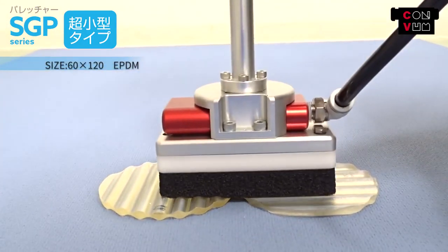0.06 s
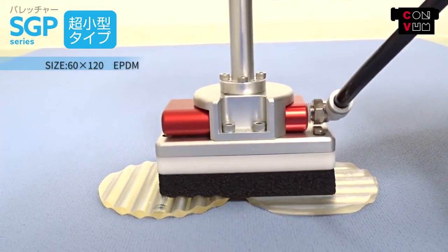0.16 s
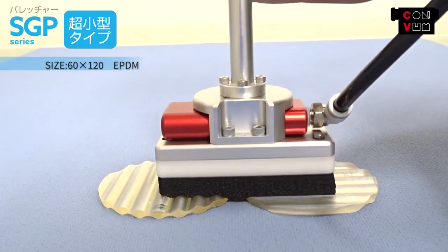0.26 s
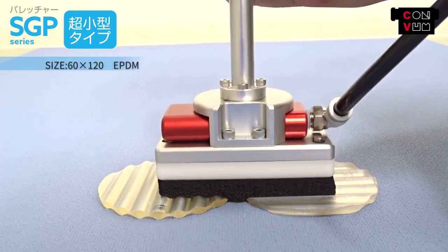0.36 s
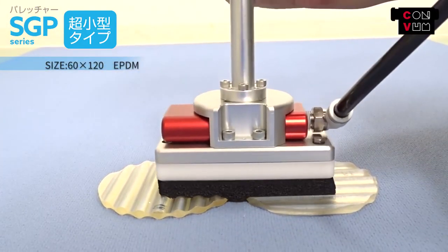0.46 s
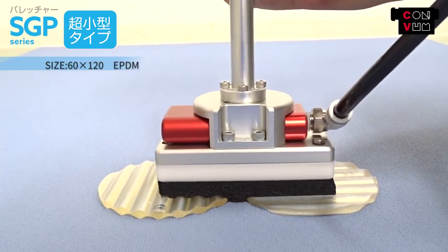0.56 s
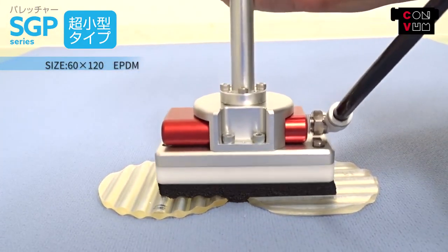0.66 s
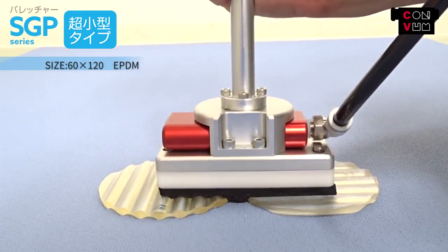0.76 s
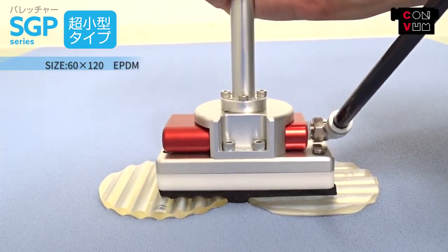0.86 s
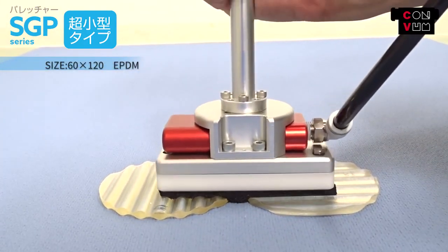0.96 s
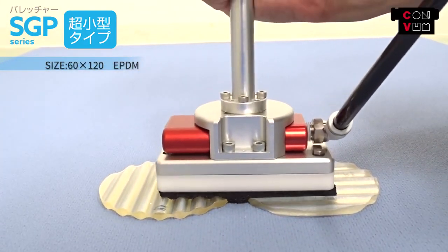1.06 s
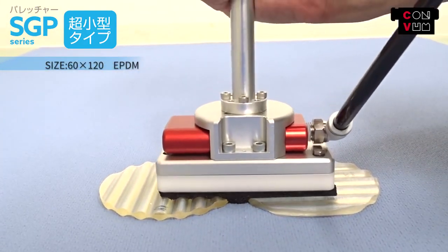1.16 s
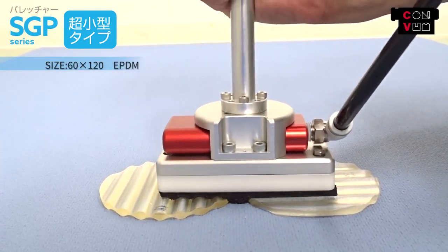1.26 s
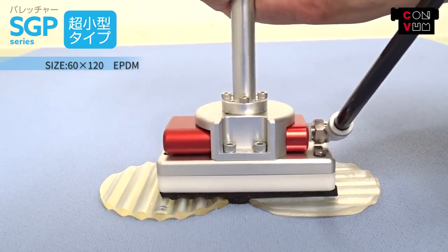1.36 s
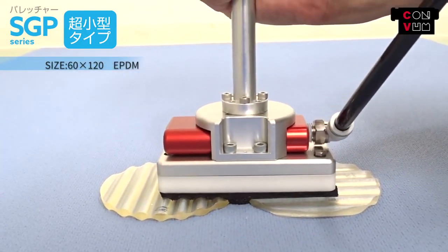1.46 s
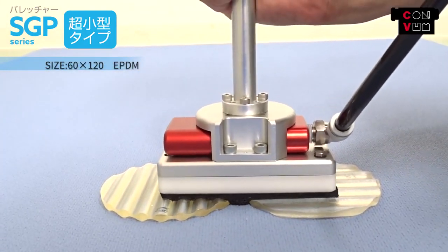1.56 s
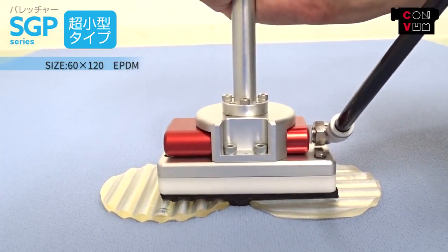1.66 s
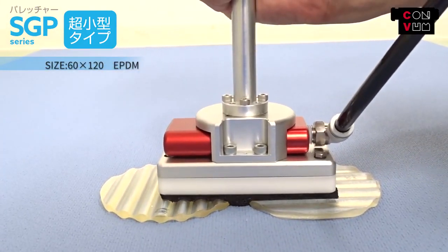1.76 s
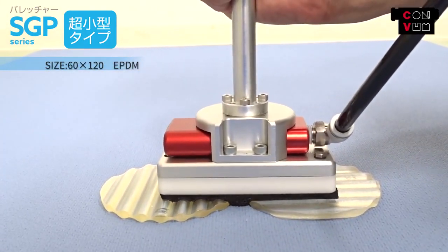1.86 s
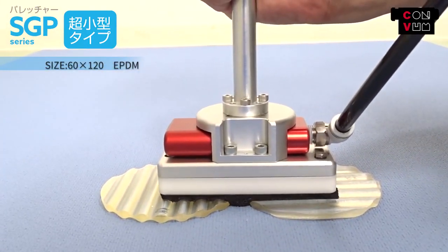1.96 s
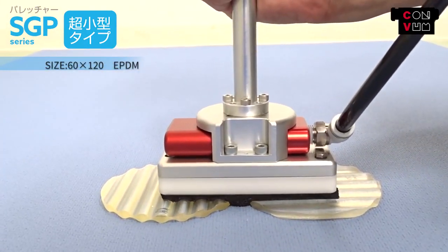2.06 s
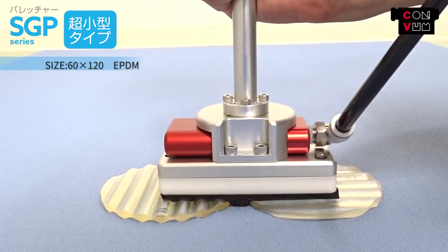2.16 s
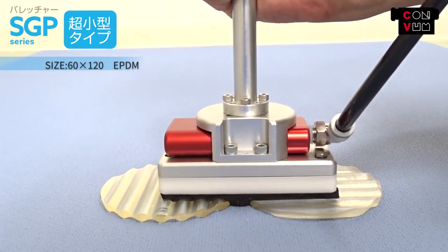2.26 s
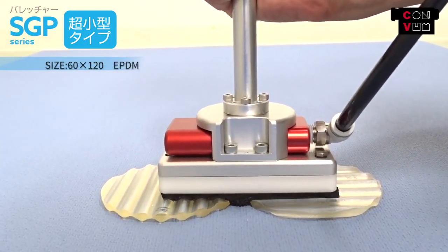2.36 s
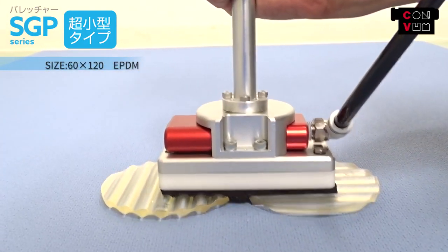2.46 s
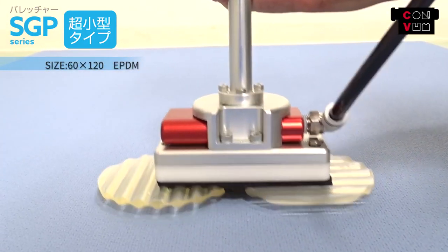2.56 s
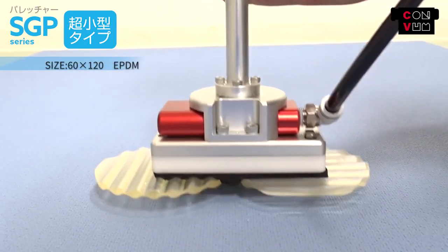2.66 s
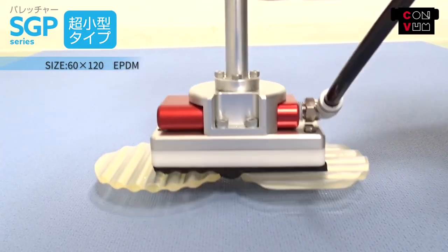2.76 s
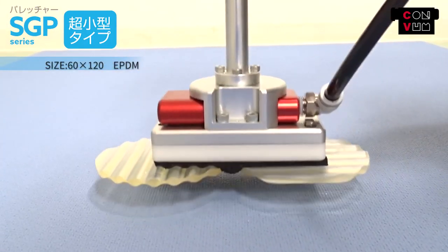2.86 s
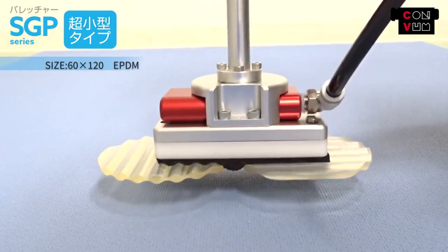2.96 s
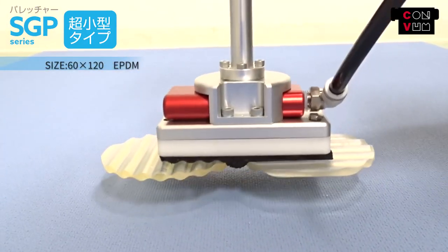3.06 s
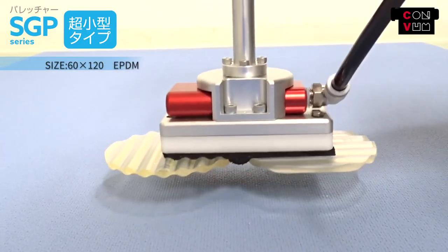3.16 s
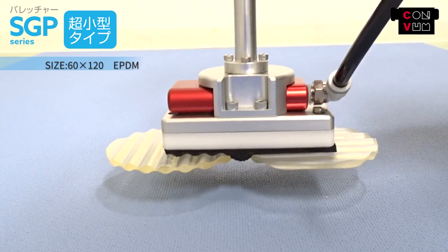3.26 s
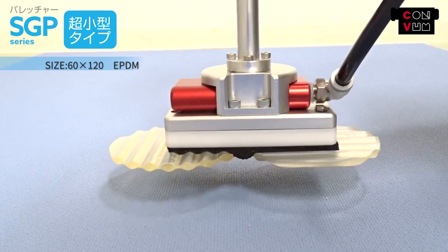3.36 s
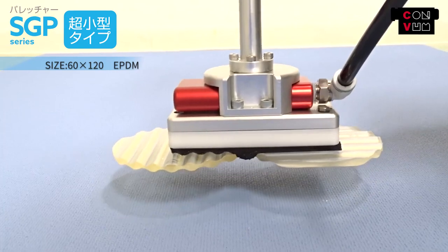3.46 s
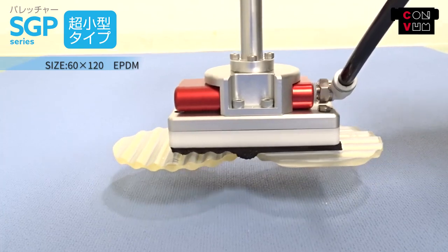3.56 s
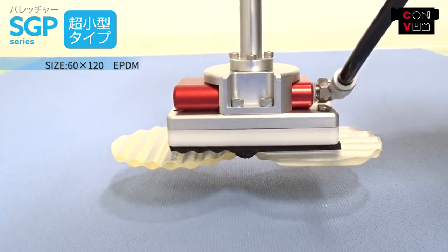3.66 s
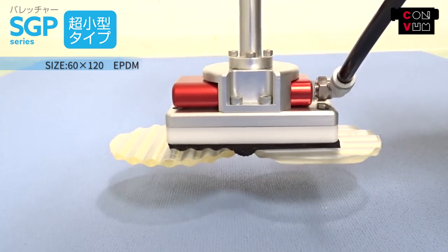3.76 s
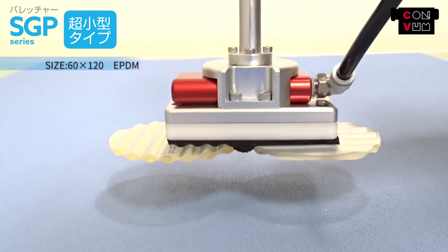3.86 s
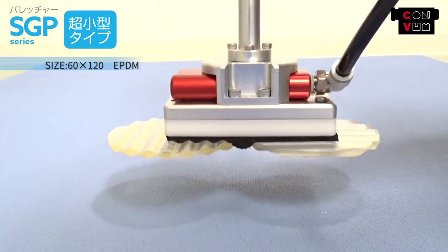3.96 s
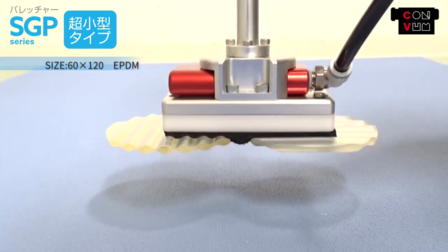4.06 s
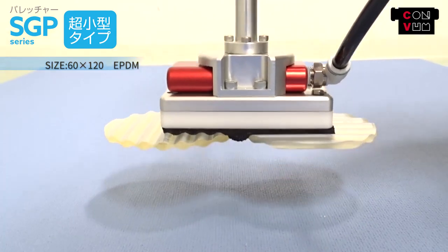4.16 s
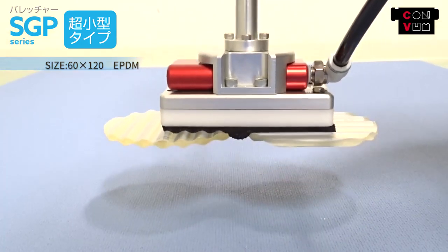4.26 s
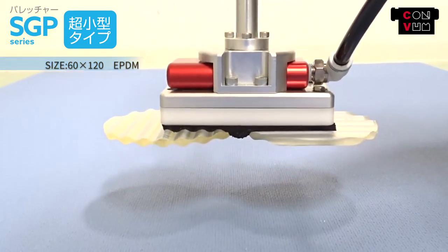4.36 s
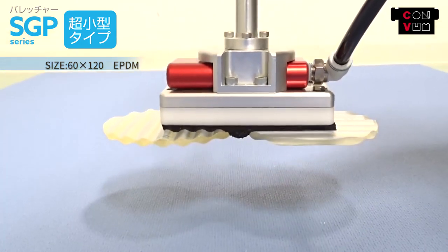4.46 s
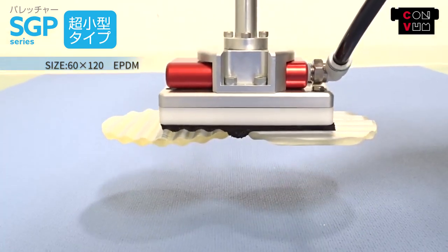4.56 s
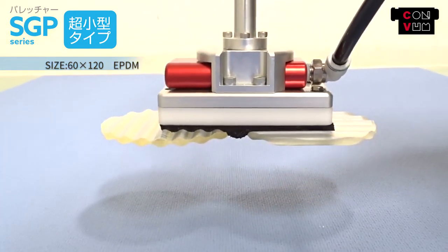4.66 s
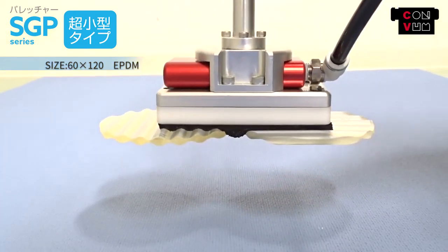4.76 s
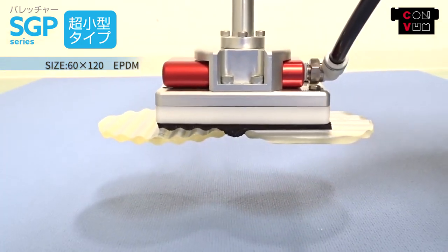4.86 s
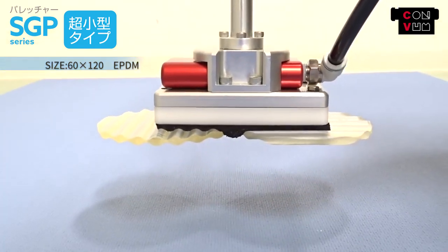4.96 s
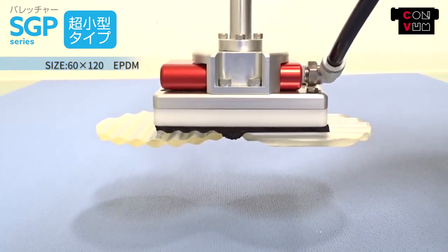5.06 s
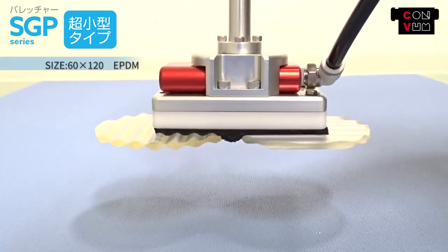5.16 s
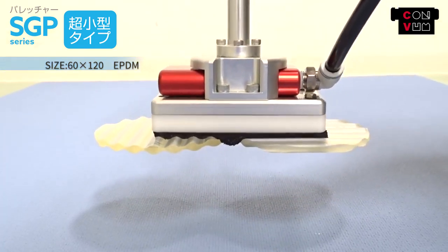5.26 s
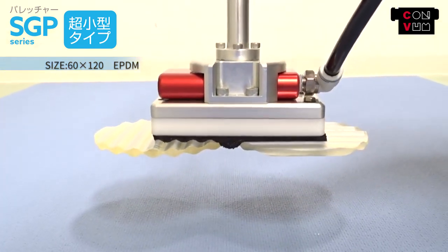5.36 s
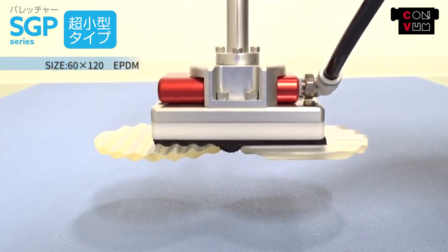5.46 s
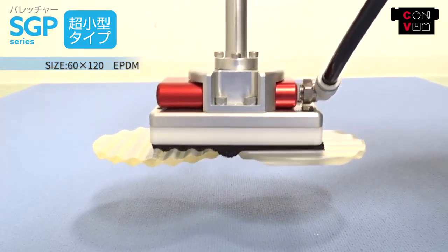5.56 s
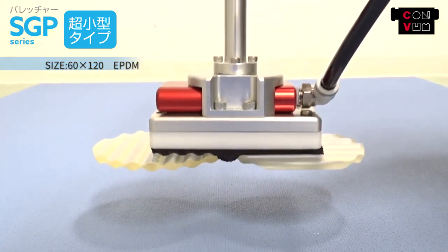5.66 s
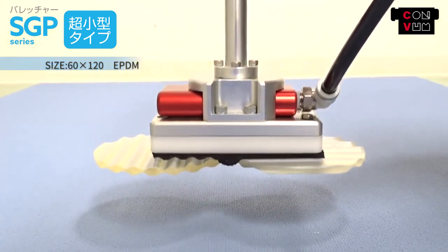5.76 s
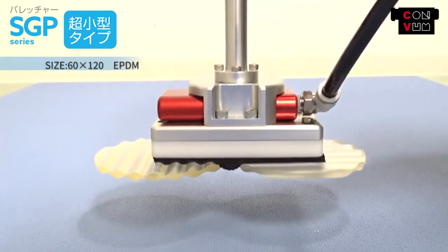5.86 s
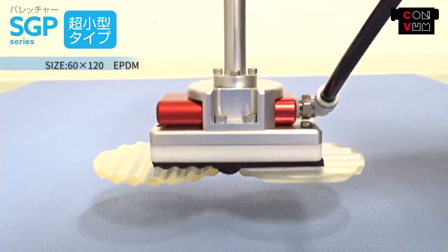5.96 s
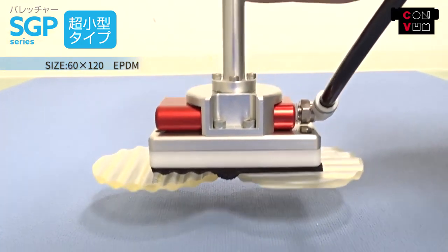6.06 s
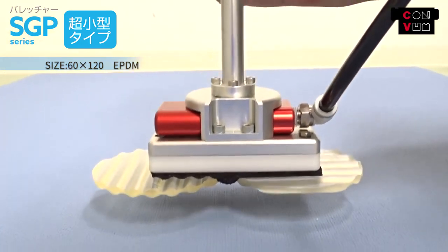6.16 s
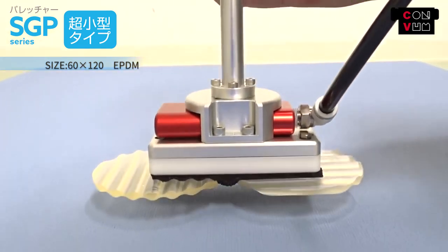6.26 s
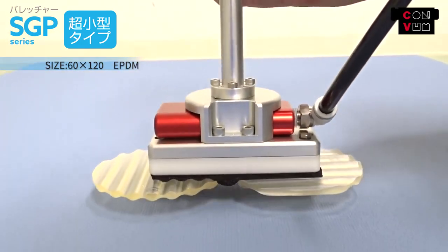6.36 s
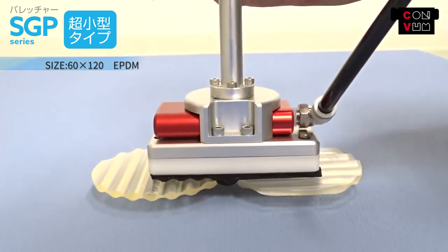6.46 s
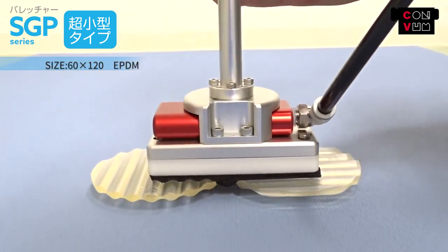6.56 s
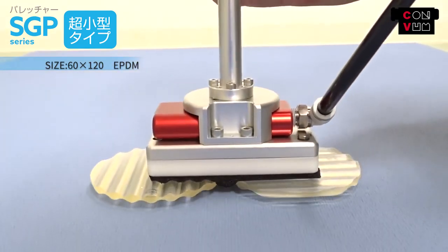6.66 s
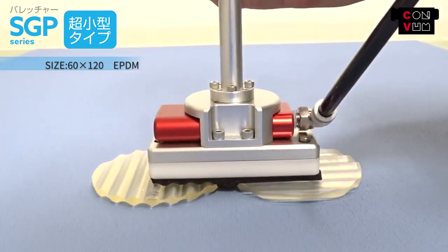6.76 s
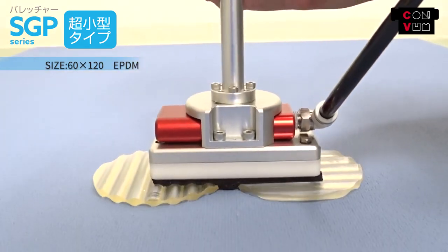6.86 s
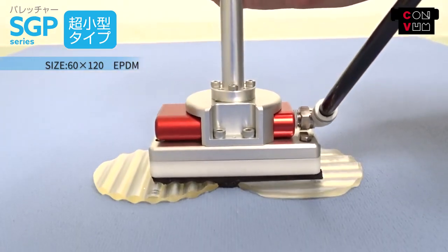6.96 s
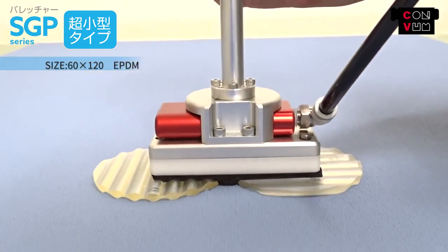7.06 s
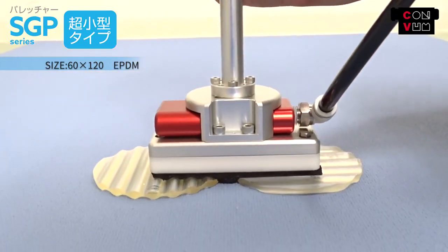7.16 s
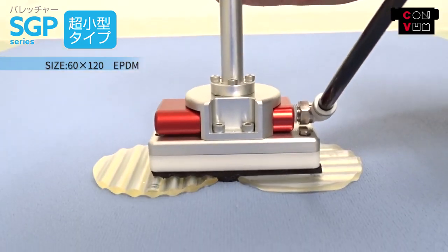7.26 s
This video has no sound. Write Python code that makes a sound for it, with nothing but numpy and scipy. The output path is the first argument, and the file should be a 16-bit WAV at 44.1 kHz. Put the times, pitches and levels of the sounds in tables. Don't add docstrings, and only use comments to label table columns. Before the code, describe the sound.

A quiet indoor workshop: low rumble, very thin high electrical whines, a few dull bumps far off. Then compressed air abruptly puffs through a suction gripper, a brief mid-toned rush that tightens almost at once into bright, steady hissing over a duller roar. As the gripper lifts thin plates the hiss shifts colour smoothly, hovers, then slides back while lowering. The air shuts off abruptly at the very end. Close, essentially mono microphone.

```python
import sys
import numpy as np
from scipy import signal
from scipy.io import wavfile
from scipy.ndimage import uniform_filter1d

SR = 44100
rng = np.random.default_rng(int(sys.argv[2]) if len(sys.argv) > 2 else 0)


def natural_amplitude(level_db):
    exponent = np.asarray(level_db, float) / 20
    return 10 ** exponent


def wrap_up_sound(samples):
    columns = np.atleast_2d(samples).T
    tamed = np.clip(columns, -1, 1)
    steps = np.round(tamed * 32767).astype(np.int16)
    wavfile.write(sys.argv[1], SR, steps)


N = 323253
SIZE, HOP = 2048, 512
HZ = np.fft.rfftfreq(SIZE, 1 / SR)[:, None]
TIMES = np.arange(N // HOP + 5) * HOP / SR


def ejector():
    height = height_at(TIMES)
    moved = step(TIMES, 4.3, .3)
    colour_db = jet_db(height, moved) + cavities_db(height)
    colour_db += .6 * patches(bins=20, frames=30)
    colour_db += .5 * patches(bins=400, frames=2)
    place = height + .5 * moved + hand_tremor()
    colour = natural_amplitude(colour_db) * echoes(place, first_db=-14, t60=.4, travel_s=.0002, count=40)
    nozzle = 1 / (1 + (3300 / (HZ + 1)) ** 12)
    out = 0
    for share, level_db in zip((nozzle, 1 - nozzle), flow_db(np.arange(N) / SR)):
        gain = colour * np.sqrt(share)
        gain = gain / np.sqrt(np.mean(gain ** 2, axis=0))
        out = out + natural_amplitude(level_db) * evened(turbulence(gain))
    return out


# [full flow t/s, rise/dB per s, easing t/s]
HISS_VALVE = (0.695, 680, 0.014)
ROAR_VALVE = (0.68, 500, .002)


def flow_db(t):
    height = height_at(t)
    end_db = -210 * np.maximum(t - 7.31, 0)
    surge_db = 4 * np.exp(-np.maximum(t - HISS_VALVE[0], 0) / .04)
    hiss_db = -26.5 + .02 * height + surge_db + valve_db(t, *HISS_VALVE)
    puff_db = 13.5 * first_rush(t)
    snap_db = -7 * (1 - step(t, .679, .001))
    roar_db = -35.5 - 2.5 * height + puff_db + snap_db + valve_db(t, *ROAR_VALVE)
    return hiss_db + end_db, roar_db + end_db


def valve_db(t, full_s, db_per_s, ease_s):
    return -db_per_s * ease_s * np.logaddexp(0, (full_s - t) / ease_s)


def first_rush(t):
    return 1 - step(t, .729, .013)


# [t/s, height/0-1]
HEIGHT = [(0, 0.12), (2.4, 0), (2.8, 0.35), (3.3, 0.58), (3.8, 0.75), (4.3, 0.87), (5.2, 0.82), (5.7, 0.93),
          (6.1, 0.68), (6.45, 0.16), (7.33, 0.03)]


def height_at(t):
    return np.interp(t, *np.transpose(HEIGHT))


# [f/Hz, level/dB per Hz]
JET_DOWN = [(18, -69), (30, -58), (153, -28.5), (284, -25), (658, -13.5), (1000, -13), (1160, -14.5),
            (1450, -6), (1680, -11), (1950, -1), (2560, -7.5), (3990, -19.5), (6080, -7), (8180, -4),
            (11000, -8), (14300, -54), (22000, -120)]
# [f/Hz, level/dB per Hz]
JET_UP = [(18, -69), (30, -59), (157, -41), (277, -30), (466, -19.5), (675, -16), (1080, -20.5),
          (1280, -12), (2620, -5.5), (3200, -10.5), (5110, -13), (5930, -4.5), (7590, -2), (10200, -7.5),
          (11000, -6), (14300, -46), (22000, -120)]
# [f/Hz, level/dB per Hz]
JET_PUFF = [(60, -45), (200, -9.5), (550, -7), (1150, -6.5), (1500, -1.5), (1950, 4.5), (2550, -4),
            (2850, -22), (3900, -41), (6860, -28.5), (7720, -21), (11000, -37), (22000, -60)]


def jet_db(height, moved):
    jet = (1 - height) * read(JET_DOWN, HZ) + height * read(JET_UP, HZ) + table_echo_db(height, moved)
    rush = first_rush(TIMES)
    return (1 - rush) * jet + rush * read(JET_PUFF, HZ)


# [first spot f/Hz, second spot f/Hz, lifted f/Hz, width f/Hz, constant level/dB]
TABLE_ECHO = [(4600, 4300, 2760, 960, -2.5), (8050, 7900, 7100, 630, 1.5), (10000, 9300, 9100, 740, 0)]
# [going up height/0-1, coming down height/0-1, reach/0-1, going up extra level/dB, coming down extra level/dB]
ECHO_FOCUS = [(.35, 0.23, 0.38, -4.5, -2.5), (0.51, 0.93, 0.19, -4, 0), (0.33, 0.28, 0.29, -3, -3.5)]


def table_echo_db(height, moved):
    total_db = 0
    for band, focus in zip(TABLE_ECHO, ECHO_FOCUS):
        first_hz, second_hz, up_hz, width, db = band
        rising, sinking, reach, rising_db, sinking_db = focus
        critical = rising + moved * (sinking - rising)
        extra_db = rising_db + moved * (sinking_db - rising_db)
        depth_db = db + extra_db * np.exp(-((height - critical) / reach) ** 2)
        down_hz = first_hz + moved * (second_hz - first_hz)
        centre_hz = down_hz + height * (up_hz - down_hz)
        total_db = total_db + depth_db * np.exp(-((HZ - centre_hz) / width) ** 2)
    return total_db


# [f/Hz, width f/Hz, lift when down level/dB, lift when up level/dB]
CAVITIES = [(660, 140, 2.4, 2.1), (1018, 61, 6, 4.5), (1180, 64, -5, -3), (1506, 60, 3, -4.5),
            (1595, 16, 0, 6), (1990, 50, -0.5, 8), (1980, 78, -0.5, -6), (2136, 80, -8.5, -2.5),
            (2337, 50, 1.5, 6.5), (2504, 72, 4, -3.5), (2597, 23, 11, 9), (2910, 90, 1, 7),
            (3570, 59, -6, 1.5), (4070, 140, 2.5, -7), (5440, 47, 6.5, 6), (5980, 52, 5.5, 5.5),
            (6150, 54, 2, 2.5), (6850, 120, 2.5, 1), (7420, 86, 2.5, 7), (7770, 100, 4.5, 7),
            (7940, 59, 1.5, 8), (8500, 160, 2.5, 5), (9310, 66, 6, 4), (9670, 340, -5.5, 0.5),
            (10330, 220, 2, 5.5)]


def cavities_db(height):
    total_db = 0
    for hz, width, down_db, up_db in CAVITIES:
        lift_db = down_db + height * (up_db - down_db)
        total_db = total_db + lift_db / (1 + ((HZ - hz) / (width / 2)) ** 2)
    return total_db


def hand_tremor():
    return .07 * sum(np.sin(2 * np.pi * (hz * TIMES + rng.random())) for hz in (.23, .41, .77, 1.3))


def echoes(height, first_db, t60, travel_s, count):
    place, lean = rng.random((count, 2)).T
    delays = .008 + .03 * place
    slopes = travel_s * (2 * lean - 1)
    coarse = height[::4]
    paths = np.ones((len(HZ), len(coarse)), complex)
    for delay, slope in zip(delays, slopes):
        turn = np.exp(-2j * np.pi * HZ * (delay + slope * coarse))
        paths += natural_amplitude(first_db - 60 * delay / t60) * turn
    return evened(np.repeat(abs(paths), 4, axis=1)[:, :len(TIMES)])


# [f/Hz, level/dB per Hz]
SHOP = [(15, -40), (30, -9.5), (75, -12), (100, -10.5), (190, -4), (290, -16), (545, -18), (760, -23),
        (1400, -23), (1850, -37.5), (5970, -51), (9200, -43), (11000, -49), (22000, -60)]


def rumble():
    hum = evened(turbulence(natural_amplitude(read(SHOP, HZ) + 2.1 * patches(bins=6, frames=4))))
    return natural_amplitude(-49 - 16 * step(np.arange(N) / SR, .75, .015)) * hum


# [t/s, peak level/dB, f/Hz, length t/s]
THUDS = [
    (.13, -46, 166, 0.054),
    (.24, -46, 73.8, .07),
    (.315, -46, 71.6, .05),
    (.49, -56, 1360, .04),
]


def bumps():
    t = np.arange(N) / SR
    out = 0
    for s, db, hz, length in THUDS:
        out = out + natural_amplitude(db) * np.exp(-(2 * (t - s) / length) ** 2) * np.sin(2 * np.pi * hz * t)
    return out


# [f/Hz, rms level/dB]
WHINES = [(7197, -81), (8000, -93), (9001, -77), (9469, -91), (10002, -92)]


def whines():
    t = np.arange(N) / SR
    return sum(natural_amplitude(db) * np.sqrt(2) * np.sin(2 * np.pi * hz * t) for hz, db in WHINES)


def turbulence(gain):
    a, b = rng.standard_normal((len(TIMES), len(HZ), 2)).T
    return signal.istft(gain * (a + 1j * b), nperseg=SIZE, noverlap=SIZE - HOP)[1][:N]


def patches(bins, frames):
    field = rng.standard_normal((len(TIMES), len(HZ))).T
    field = uniform_filter1d(field, bins, axis=0)
    return evened(uniform_filter1d(field, frames, axis=1))


def evened(x):
    return x / np.sqrt(np.mean(abs(x) ** 2) + 1e-20)


def read(points, hz):
    f, value = np.transpose(points)
    return np.interp(np.log(hz + 1), np.log(f + 1), value)


def step(t, s, takes_s):
    return .5 + .5 * np.tanh((t - s) / (2 * takes_s))


def scene():
    return np.tile(ejector() + rumble() + bumps() + whines(), (2, 1))


# [t/s, low f/Hz, high f/Hz, size against the middle]
SPLITS = [
    (.39, 10300, 11000, 1.5),
    (2.625, 6800, 8960, 1.5),
    (4.25, 6240, 7700, 1.7),
    (5.31, 9500, 11000, 1.9),
    (6.891, 4200, 5170, 1.5),
]


def stray_side(mid):
    size = abs(signal.stft(mid, nperseg=SIZE, noverlap=SIZE - HOP)[2])
    smooth = uniform_filter1d(size, 18, axis=0)
    smooth = np.pad(smooth, ((0, 0), (0, len(TIMES) - size.shape[1])))
    mask = 0
    for s, low_hz, high_hz, share in SPLITS:
        moment = abs(TIMES - s) <= HOP / SR / 2
        mask = mask + share * moment * (HZ > low_hz) * (HZ < high_hz)
    return turbulence(mask * smooth)


def low_pass(x):
    return signal.sosfilt(signal.butter(12, 12260, fs=SR, output="sos"), x)


def record(dry):
    lowpass = signal.firwin(2047, 11010, window=("kaiser", 9), fs=SR)
    mid = signal.oaconvolve(dry[0], lowpass, "same")
    side = stray_side(mid)
    return low_pass(np.array([mid + side, mid - side]))


dry = scene()
out = record(dry)
wrap_up_sound(out)
```